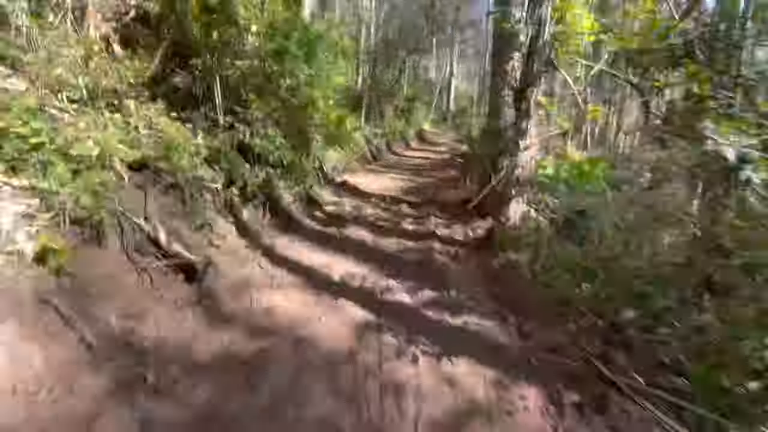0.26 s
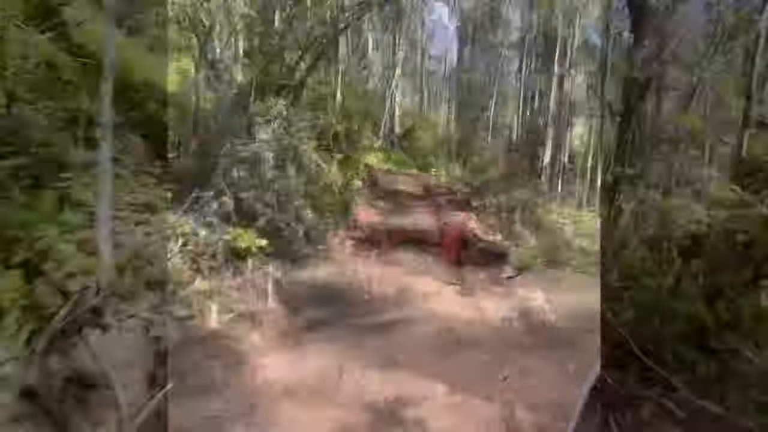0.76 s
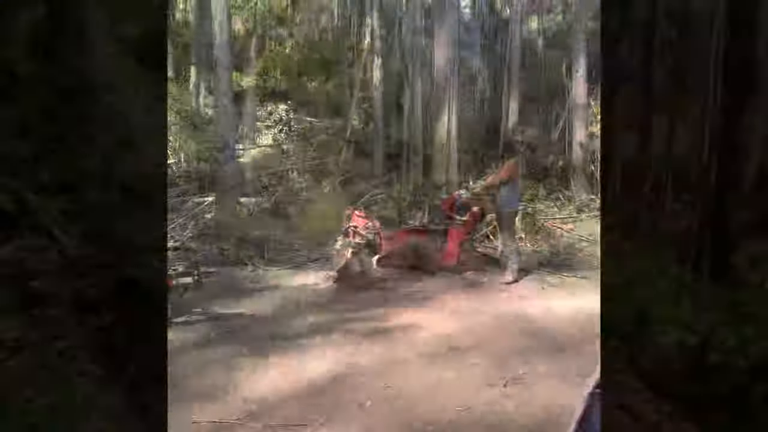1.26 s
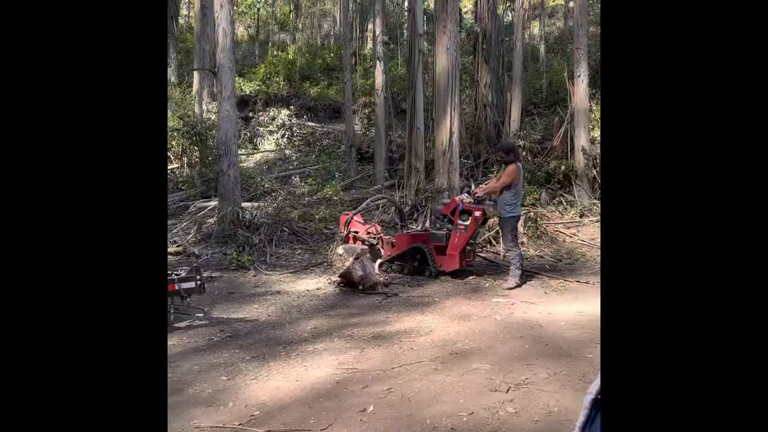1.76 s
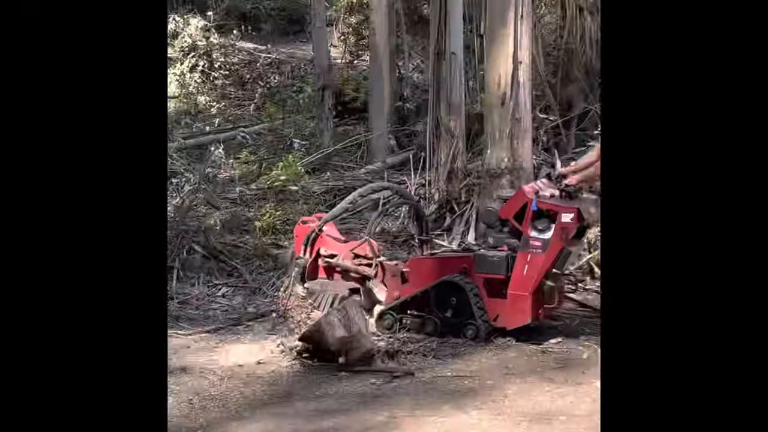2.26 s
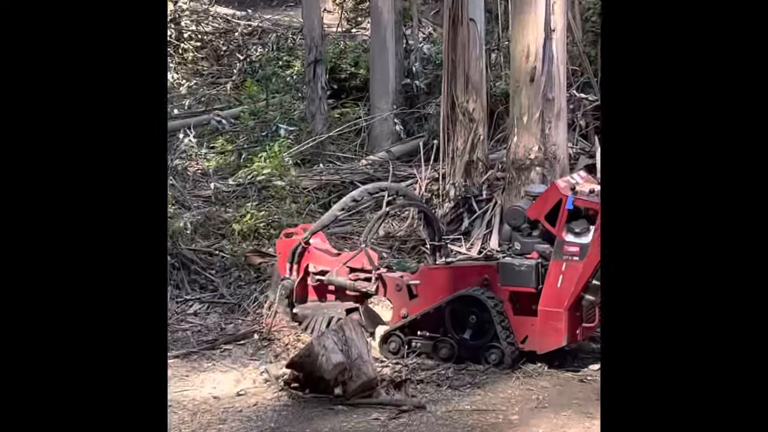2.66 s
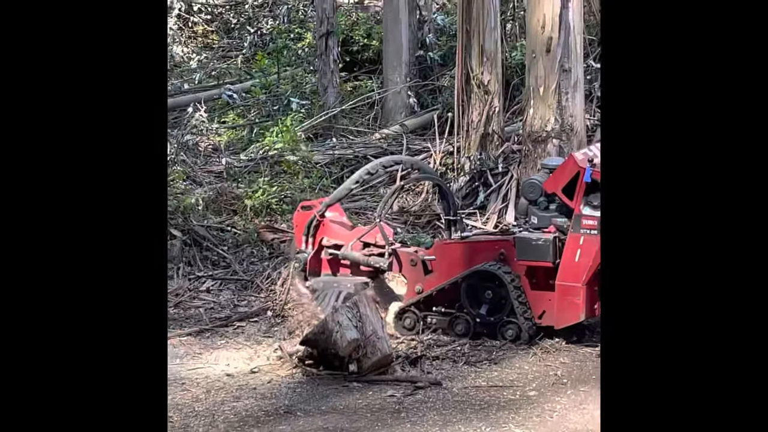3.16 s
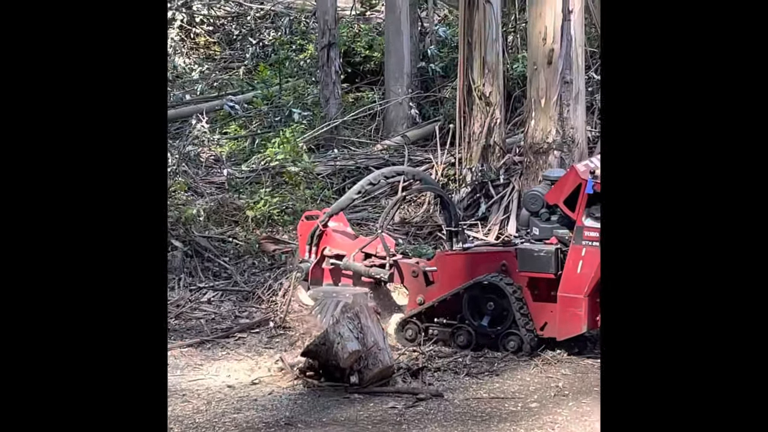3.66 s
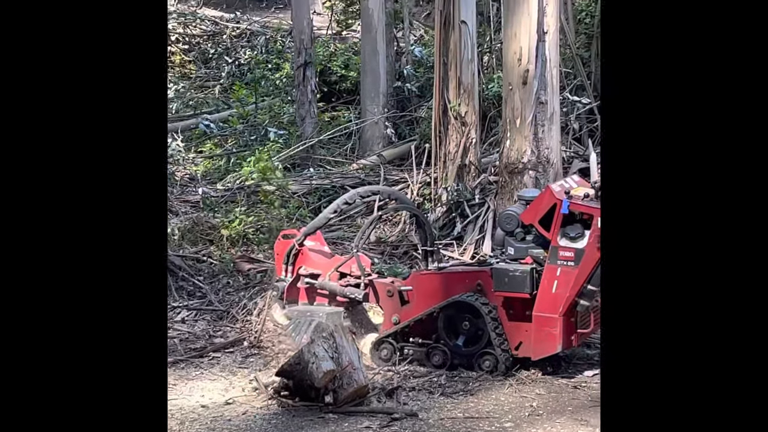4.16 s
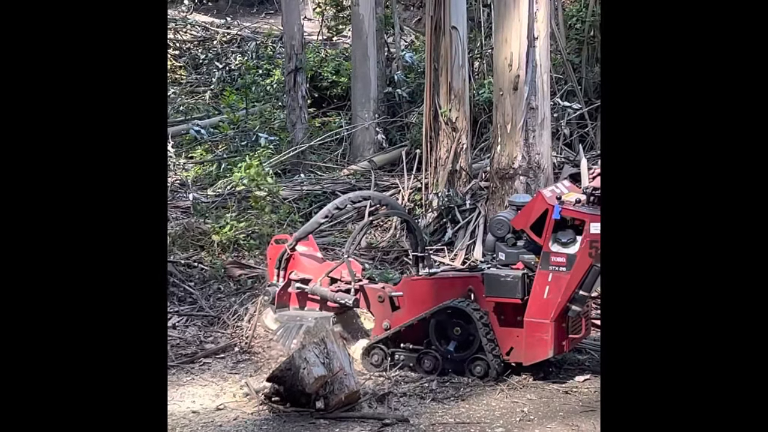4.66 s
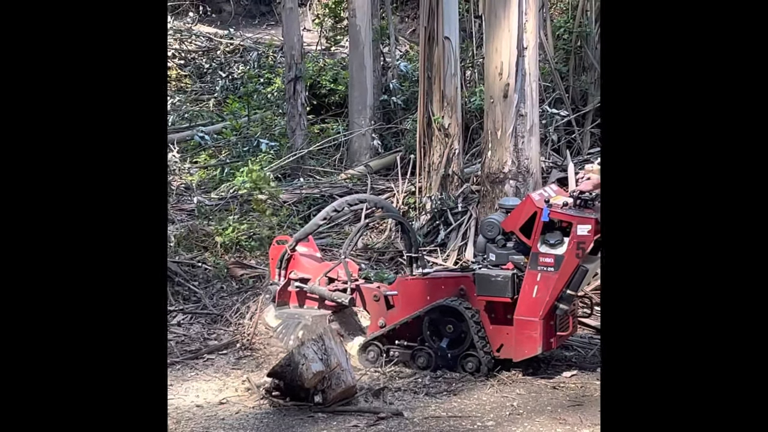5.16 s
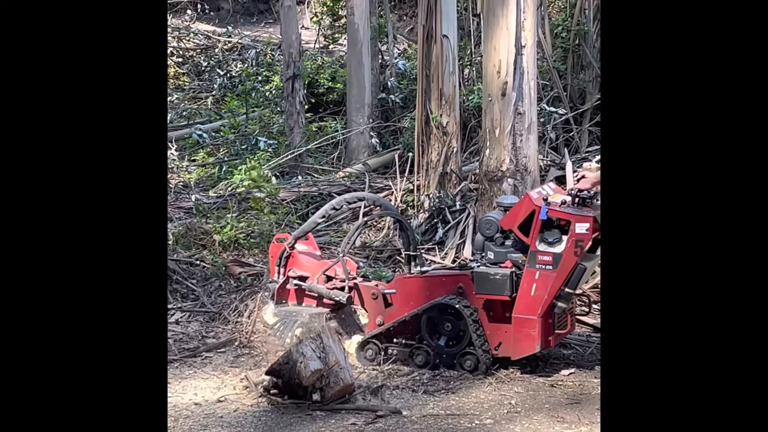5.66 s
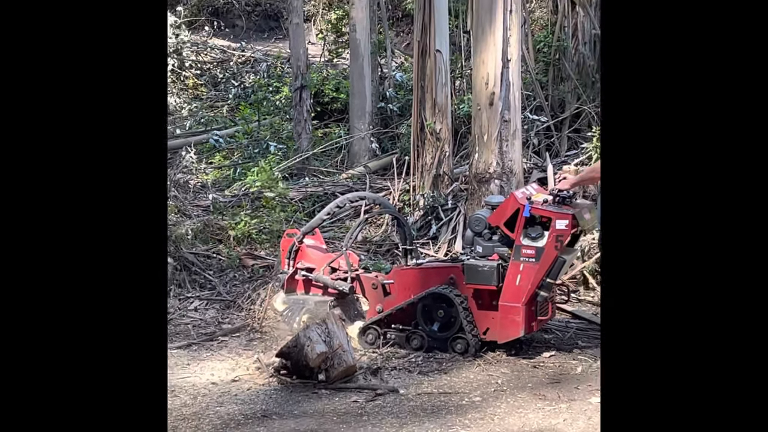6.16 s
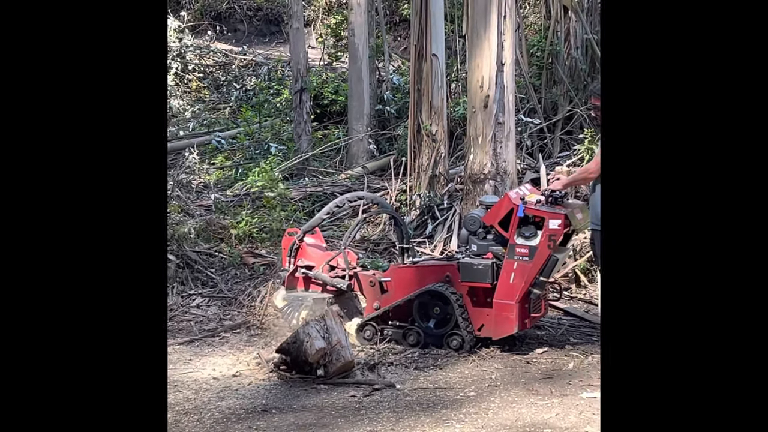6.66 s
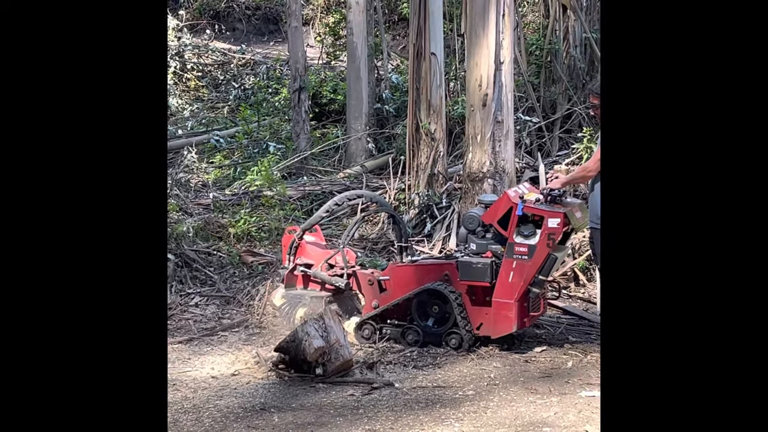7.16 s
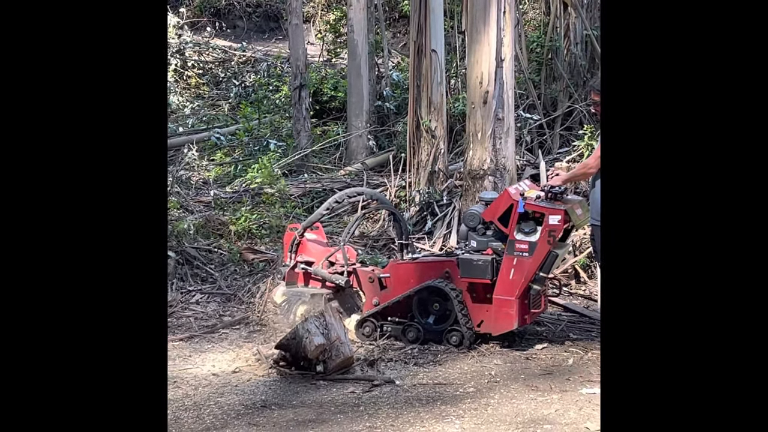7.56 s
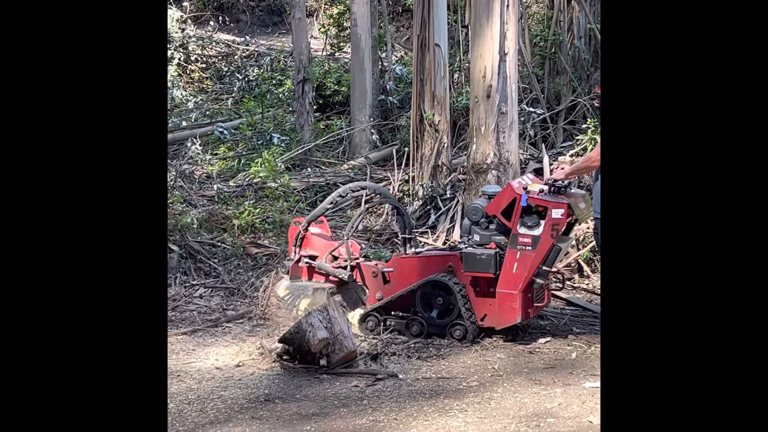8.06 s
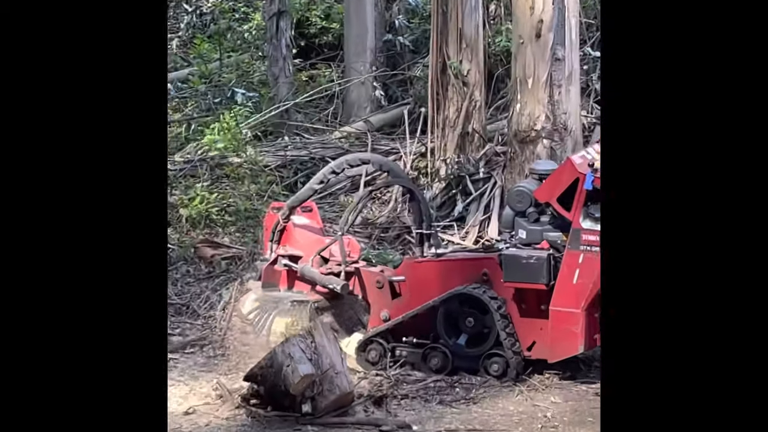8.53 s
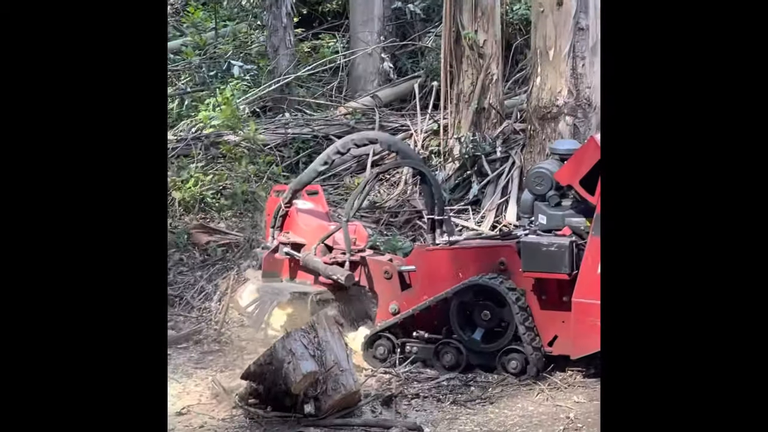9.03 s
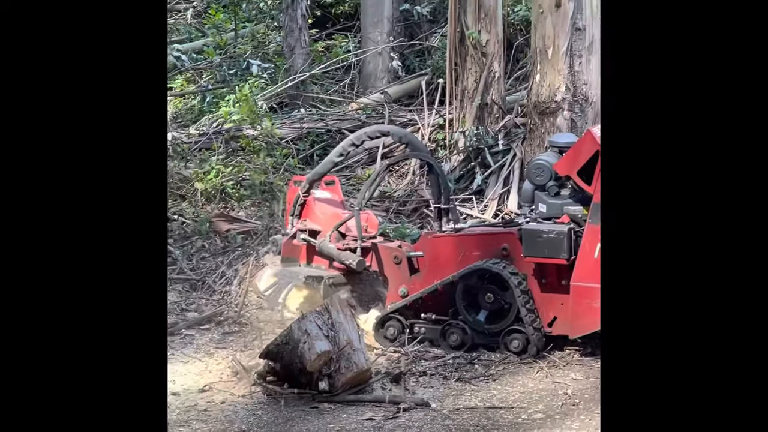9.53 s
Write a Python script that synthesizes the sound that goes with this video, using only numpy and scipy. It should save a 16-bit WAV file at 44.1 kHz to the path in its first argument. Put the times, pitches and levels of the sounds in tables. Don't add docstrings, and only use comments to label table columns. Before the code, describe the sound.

Small petrol engine fades in droning steadily outdoors, then a stump grinder's toothed wheel bites into wood with rapid knocking, bright cracks and spitting chips.

```python
import sys
import numpy as np
from scipy import signal
from scipy.fft import rfft, irfft
from scipy.io import wavfile
from scipy.ndimage import uniform_filter1d

SR = 44100
rng = np.random.default_rng(int(sys.argv[2]) if len(sys.argv) > 2 else 0)


def generate_wav(signal):
    frames = np.transpose(np.atleast_2d(signal))
    scaled = np.clip(frames, -1, 1) * 32767
    pcm = np.round(scaled).astype(np.int16)
    wavfile.write(sys.argv[1], SR, pcm)


def ratio(d):
    e = np.asarray(d, float) / 20
    return 10 ** e


N = 431738
T = np.arange(N) / SR
F = np.fft.rfftfreq(N, 1 / SR)

# (time [s], load [0-1])
LOAD = [
    (0, 0.4),
    (2.8, 0),
    (3.4, 0.8),
    (9.79, 1),
]
# (time [s], fifth order of the four-stroke cycle [Hz])
SPEED = [(0.38, 142.3), (0.66, 140.3), (0.98, 140.8), (1.36, 144.9), (2.84, 144.8), (3.41, 135.2),
         (6.75, 135.3), (6.85, 132.5), (7.09, 132.7), (7.37, 135.3), (8.49, 135.4), (8.59, 133.6),
         (8.77, 133.8), (8.9, 135.4), (9.68, 135.2)]
# (order [multiple of cycle rate], level [dB])
FREE_ORDERS = [(1, -50), (2, -6), (3, -7), (4, -21), (5, 0), (6, -8), (7, -12.5), (8, -17), (9, -21.5),
               (10, -19), (11, -28), (12, -48), (13, -29), (14, -43), (15, -44), (16, -26)]
# (order [multiple of cycle rate], level [dB])
LOADED_ORDERS = [(1, -42), (2, -5), (3, -15), (4, -36), (5, 0), (6, -8.5), (7, -36), (8, -12), (9, -14.5),
                 (10, -32), (11, -26), (12, -30), (13, -20), (14, -28), (15, -30), (16, -30)]
# (pump multiple [-], level [dB])
PUMP_REST = [(2, -22), (3, -31), (4, -29)]
# (start [s], length [s], pump multiple [-], level [dB])
VALVES = [
    (.5, .67, 3, -13),
    (.55, .5, 4, -15),
    (.8, 2.05, 2, -9),
    (1.2, 1.75, 4, -16),
    (3.0, .33, 3, -14),
]
# (frequency [Hz], level per Hz [dB])
ROAR = [(40, -6.5), (200, 2), (330, 0.5), (430, -5.5), (600, 0), (1300, -2.5), (1650, -3.5), (2400, -4.5),
        (3200, -9), (5500, -14.5), (8500, -14.5), (10300, -8), (12000, -21), (14000, -38)]
# (frequency [Hz], width [Hz], level [dB])
PANELS = [(630, 92, 2.5), (830, 103, -1), (1115, 92, 4.5), (1243, 110, 1.5), (1710, 89, -1),
          (1347, 100, 3.5), (1762, 52, 4.5), (2020, 136, 5.5), (2348, 83, 3.5), (4970, 750, 2.5)]
# (frequency [Hz], level [dB])
SCATTER = [(250, -30), (480, -12), (1000, -9), (1700, -14), (2600, -8), (5000, -6), (8000, -7), (10500, -9),
           (14000, -9)]
# (time [s], effort [dB])
EFFORT = [(2.72, -6), (2.9, 0), (3.0, -3.5), (3.15, 3.5), (3.27, 4.5), (3.41, 2.5), (3.5, 1.5), (3.72, -1),
          (3.88, -1), (4.02, -1.5), (4.4, 0), (4.65, 0), (5.3, -0.5), (6.9, -1), (7.9, -4.5), (8.45, -2),
          (9.3, -1.5), (9.79, -3)]
# (frequency [Hz], width [Hz], level [dB])
STUMP = [(104, 23, -13), (241.5, 87, -9), (355.2, 18.8, 2.5), (380, 78, -8)]
# (frequency [Hz], width [Hz], level [dB])
GUARD = [(566, 22.8, 4), (653.6, 49, 0.5), (824, 126, -14.5), (1026, 46, -3.5), (1107, 41, -2.5),
         (1303, 24, -8), (1802, 62, -10.5), (1960, 78, -4.5)]
# (frequency [Hz], level per Hz [dB])
CHIPS = [(1500, 5.5), (3000, -5.5), (5500, -0.5), (8500, -8), (10500, -1.5), (11300, 8.5), (12200, -17),
         (13200, -6), (14500, -39)]
# (time [s], knock [dB], thud above the knock [dB])
BLOWS = [(3.1987, -21, -2), (3.2685, -20, -3), (3.3, -20, -3), (3.34, -22, -9), (3.3689, -10, 2.5),
         (3.4062, -13, 6), (3.8264, -17, 0), (4.306, -15, -6), (4.3446, -13, -1), (4.5525, -22, 3),
         (4.6545, -15, 2), (5.004, -9.5, -3), (5.314, -9, -11), (5.4215, -9, -11), (5.4916, -12.5, -0.5),
         (6.0305, -16, -14), (6.3454, -7, -7), (6.5193, -10, -16), (6.8167, -12, -2), (6.961, -9.5, -4.5),
         (7.065, -11, -5), (7.5177, -14.5, 4.5), (8.0024, -18, -7), (8.3477, -7.5, -18), (8.384, -5, -6.5),
         (8.418, -7, -8), (8.5254, -7.5, 1.5), (8.6698, -7.5, -6), (8.9147, -9.5, -3.5), (9.2316, -17, -6)]
# (time [s], crack [dB], scrape above the crack [dB])
BITES = [(3.2307, -5, -17), (3.2662, -11, -14), (3.319, -10, -18), (3.334, -8, -24), (3.3689, -9, -22),
         (3.4043, -11, -9), (3.4612, -8, -15), (3.509, -9, -13), (3.5989, -9, -13), (3.6468, -12, -8),
         (3.681, -14, -5), (3.786, -14, -12), (3.856, -16, -1), (3.946, -8.5, -12), (4.4984, -11, -17),
         (5.0002, -14, -8), (5.281, -13, -9), (6.185, -15.5, -5), (6.6554, -11, -10), (6.8161, -10, -7),
         (6.9567, -11, -8), (8.3481, -16, -7), (8.4187, -13, -1), (8.526, -18, 3.5), (8.6726, -16.5, 0),
         (8.8769, -22, 3), (8.9817, -11, -10), (9.0854, -13.5, -8), (9.1238, -11, -9), (9.651, -11, -10)]
# (frequency [Hz], level per Hz [dB])
CRACK = [(2000, -5), (4000, -29), (6500, -5), (9000, 1), (10300, 8), (11300, 5.5), (12300, -19),
         (13500, -15), (14500, -34)]
# (frequency [Hz], left minus right [dB])
PORT_DB = [(250, -0.2), (370, 1.6), (480, 7.2), (620, 4.7), (760, 2.3), (950, 9.3), (1080, 7.7),
           (1230, 3.0), (1350, 4.2), (1600, 0.1)]
# (frequency [Hz], phase by which left leads [rad])
PORT_PHASE = [(250, 0), (400, .5), (620, -.2), (800, .3), (1250, -.5), (1600, 0), (2100, .1), (2450, .6),
              (4000, .7),
              (4500, 1.3), (5000, 3.6), (5300, 5.4), (5700, 6.1), (6350, 6.6), (8400, 8.9), (9100, 9.42),
             (9700, 9.8), (11600, 11.7), (12000, 12.57), (22050, 12.57)]
# (lower edge [Hz], its flutter [Hz], upper edge [Hz], its flutter [Hz])
SUM_GAPS = [(8500, 170, 9620, 30), (13300, 380, 23000, 0)]
# (lower edge [Hz], its flutter [Hz], upper edge [Hz], its flutter [Hz])
DIFFERENCE_GAPS = [(-1, 0, 250, 20), (1620, 60, 2050, 260), (5700, 70, 6300, 40), (11750, 40, 23000, 0)]
SHARP_S = [3.25, 3.27, 3.32, 3.45, 3.66, 3.95, 5.83, 6.12, 6.81, 8.53, 9.33, 9.58]

FADE_START_S, FADE_S, FADE_BEND = 0.38, 1.12, 1.38
ENGINE_DB, LOAD_SAG_DB = -16.5, -0.5
SECOND_FIRING = 3 / 8
PUMP_ORDER, VALVE_SLEW_S = 9.85, 0.13
FAN_ORDER, FAN_DB, BELT_ORDERS, BELT_DB = 26, -21, (18.7, 22.85, 60.1), -23
ROAR_DB, ROAR_LOAD_DB, ROAR_PATCHY_DB = -6.5, 1.81, 0.7
TOOTH_HZ = 57.41
PROUD_TURN = 1.55
KNOCK_DB, RING_DB, CHIP_DB = -23, -25.5, -33
KNOCK_SLOPE, RING_SLOPE, CHIP_SLOPE = 1.74, 0.38, 0.96
GRAIN_DB = 0.35
TOUCH_RING_DB, TOUCH_S, TOUCH_LENGTH_S = 4, 3.09, 0.14
BITE_SHARE, BLOW_SHARE = 0.24, 0.19
SMALL_CRACK_DB, SMALL_SCRAPE_DB = -16, -9.5
SMALL_KNOCK_DB, SMALL_THUD_DB, SMALL_SPREAD_DB = -14.5, -17, 2
TOP_HZ = 13900


def level_over_time(table):
    return np.interp(T, *np.transpose(table))


def along(points):
    hz, value = np.transpose(points)
    return np.interp(np.log(F + 1), np.log(hz + 1), value)


def unit(x):
    return x / np.sqrt(np.mean(x ** 2))


def colour(x, gain):
    return irfft(rfft(x) * gain, N)


def modes(table):
    total = 0
    for k, (hz, width, db) in enumerate(table):
        damping = 1j * F * width
        total = total + (-1) ** k * ratio(db) * damping / (hz ** 2 - F ** 2 + damping)
    return total


def walk(rate):
    hold = int(SR / rate)
    steps = np.repeat(rng.standard_normal(N // hold + 1), hold)
    return 0.674 * uniform_filter1d(uniform_filter1d(steps, hold), hold)[:N]


def bursts(times, size, decay_s):
    hits = np.zeros(N)
    np.add.at(hits, np.clip((times * SR).astype(int), 0, N - 1), size ** 2)
    power = signal.lfilter([1], [1, -np.exp(-2 / (decay_s * SR))], hits)
    return np.sqrt(np.abs(uniform_filter1d(power, size=40, origin=19)))


def exhaust(turn, load):
    out = 0
    for (k, free_db), (_, loaded_db) in zip(FREE_ORDERS, LOADED_ORDERS):
        unsteady_db = (0.06 + 0.1 * load) * k * walk(14)
        db = free_db + load * (loaded_db - free_db) + unsteady_db
        lead = 2.4 + 1.2 * np.exp(-((k - 5.5) / 1.3) ** 4) + 0.012 * k * walk(12)
        sign = np.sign(np.cos(np.pi * k * SECOND_FIRING))
        out = out + sign * ratio(db) * np.cos(2 * np.pi * k * turn + lead)
    return 1.3 * out


def pump(turn):
    out = 0
    for k, rest_db in PUMP_REST:
        db = rest_db + 1.5 * walk(9)
        for start, length, line, held_db in VALVES:
            if line == k:
                inside_s = np.minimum(T - start, start + length - T)
                db = db + (held_db - rest_db) * np.clip(inside_s / VALVE_SLEW_S + 0.5, 0, 1)
        out = out + ratio(db) * np.cos(2 * np.pi * k * PUMP_ORDER * turn + 0.1 * walk(15))
    return out


def fan_and_belt(turn, load):
    out = ratio(FAN_DB - 6 * load) * np.cos(2 * np.pi * FAN_ORDER * turn)
    for k in BELT_ORDERS:
        out = out + ratio(BELT_DB - 12 * load + 2 * walk(8)) * np.cos(2 * np.pi * k * turn)
    return out


def roar(turn, load):
    puff = np.exp(-(turn % 1) / 0.16) + 0.55 * np.exp(-((turn - SECOND_FIRING) % 1) / 0.16)
    clatter = unit(np.interp(turn % 1, np.linspace(0, 1, 250), rng.standard_normal(250)))
    clatter = colour(clatter, F ** 4 / (F ** 4 + 900 ** 4))
    noise = rng.standard_normal(N) + (0.3 - 0.16 * load) * clatter
    noise = noise * (1 + 1.1 * puff) * ratio(1.2 * walk(25))
    panels_db = sum(db * np.exp(-0.5 * ((F - hz) / (width / 2)) ** 2) for hz, width, db in PANELS)
    return unit(colour(noise, ratio(along(ROAR) + panels_db)))


def trunks(x):
    z = signal.stft(x, nperseg=512)[2]
    paths = np.exp(2j * np.pi * rng.random((2,) + z.shape))
    scattered = signal.istft(z * paths, nperseg=512)[1][:, :N]
    return colour(scattered, ratio(along(SCATTER) - 1.2))


def wheel():
    effort_db = level_over_time(EFFORT)
    knock_db = KNOCK_DB + KNOCK_SLOPE * effort_db + GRAIN_DB * walk(11)
    ring_db = RING_DB + RING_SLOPE * effort_db + GRAIN_DB * walk(11)
    chip_db = CHIP_DB + CHIP_SLOPE * effort_db + GRAIN_DB * walk(11)

    count = int(N / SR * 60)
    slip, force, ring_luck, chip_luck = rng.standard_normal((count, 4)).T
    times = (np.arange(count) + PROUD_TURN + 0.1 + 0.03 * slip) / TOOTH_HZ
    teeth_db = np.resize([-3.5, -9, -3.0, -10.0], count)
    knock = bursts(times, ratio(teeth_db + 4 * force), 0.003)
    ring = bursts(times, ratio(teeth_db + 2.9 * force + 1.4 * ring_luck), 0.0022)
    chip = bursts(times, ratio(teeth_db + 4.6 * chip_luck), 0.0052)
    fibre_noise, guard_noise, chip_noise = rng.standard_normal((3, N))

    push = np.diff(bursts(times, ratio(teeth_db + 2.7 * force), 0.00082), prepend=0)
    pushed = unit(colour(push, modes(STUMP)))
    torn = unit(colour((0.76 + knock) * fibre_noise, modes(STUMP)))
    stump = unit(pushed + 1.02 * torn) * ratio(knock_db)

    touch_db = TOUCH_RING_DB * np.exp(-((T - TOUCH_S) / TOUCH_LENGTH_S) ** 2)
    guard = unit(colour((0.37 + ring) * guard_noise, modes(GUARD))) * ratio(ring_db + touch_db)
    chips = unit(colour((0.18 + chip) * chip_noise, ratio(along(CHIPS)))) * ratio(chip_db)
    return (stump + guard + chips) * np.clip((T - EFFORT[0][0]) / 0.11, 0, 1)


def small_spots(share, first_db, second_db):
    luck, slip, size, body = rng.random((int(N / SR * TOOTH_HZ / 2), 4)).T
    s = (2 * np.arange(len(luck)) + PROUD_TURN + 0.2 * slip) / TOOTH_HZ
    effort_db = np.interp(s, *np.transpose(EFFORT))
    first = first_db + SMALL_SPREAD_DB * 2 * (2 * size - 1) + effort_db / 2
    second = second_db + SMALL_SPREAD_DB * 2 * (2 * body - 1)
    return np.transpose([s, first, second])[(luck < share) & (s > EFFORT[0][0])]


def hard_spots():
    crack_noise, scrape_noise, knock_noise, thud_noise = rng.standard_normal((4, N))
    small_bites = small_spots(BITE_SHARE, SMALL_CRACK_DB, SMALL_SCRAPE_DB)
    s, crack_db, scrape_db = np.vstack([BITES, small_bites]).T
    crack = unit(colour(crack_noise, ratio(along(CRACK)))) * bursts(s, ratio(crack_db - 5.5), 0.0031)
    scrape = unit(colour(scrape_noise, modes([(3350, 2000, 0)])))
    scrape = scrape * bursts(s, ratio(crack_db + scrape_db - 3.5), 0.0089)

    small_blows = small_spots(BLOW_SHARE, SMALL_KNOCK_DB, SMALL_THUD_DB)
    s, knock_db, thud_db = np.vstack([BLOWS, small_blows]).T
    tooth_modes = modes([(1100, 220, -7.0), (1960, 200, 1), (2440, 310, -5.0), (3080, 1500, -16.0)])
    knock = unit(colour(knock_noise, tooth_modes)) * bursts(s, ratio(knock_db - 7.0), 0.0078)
    thud = thud_noise * bursts(s + 0.003, ratio(knock_db + thud_db), 0.011)
    thud = unit(colour(thud, modes(STUMP) + ratio(3) * modes(GUARD)))
    return crack + scrape + knock + ratio(-31.5) * thud


def scene():
    load = np.clip(level_over_time(LOAD), 0, 1)
    cycle_hz = level_over_time(SPEED) / 5 * (1 + 0.002 * load * walk(4))
    turn = np.cumsum(cycle_hz) / SR + 0.0015 * walk(10)
    fade = 1 - np.clip(1 - (T - FADE_START_S) / FADE_S, 0, 1) ** FADE_BEND
    running = ratio(ENGINE_DB + LOAD_SAG_DB * load) * fade
    tones = (exhaust(turn, load) + pump(turn) + fan_and_belt(turn, load)) * running
    roar_db = ROAR_DB + load * (ROAR_LOAD_DB + ROAR_PATCHY_DB * walk(12))
    noises = ratio(roar_db) * roar(turn, load) * running + wheel() + hard_spots()
    return tones + noises + trunks(noises + 0.4 * tones)


def drop_bands(x, table):
    hz, s, z = signal.stft(x, SR, "cosine", nperseg=2048)
    sharp = np.min(np.abs(s[:, None] - SHARP_S), axis=1) < 512 / SR
    for low, low_flutter, high, high_flutter in table:
        jump = rng.standard_normal((2, len(s)))
        above = hz[:, None] > low + low_flutter * jump[0]
        below = hz[:, None] < high + high_flutter * jump[1]
        z = np.where(above & below & ~sharp, 0, z)
    return signal.istft(z, SR, "cosine", nperseg=2048)[1][:N]


def roll_off(x):
    return signal.sosfilt(signal.butter(12, 14860, fs=SR, output="sos"), x)


def record(dry):
    lead = np.interp(F, *np.transpose(PORT_PHASE)) / 2
    port = ratio(along(PORT_DB) / 2) * np.exp(1j * lead)
    rounded = np.tanh(colour(dry, np.array([port, 1 / port])))
    left, right = colour(rounded, 1 / np.sqrt(1 + (F / TOP_HZ) ** 60))
    both = drop_bands(left + right, SUM_GAPS) / 2
    apart = drop_bands(left - right, DIFFERENCE_GAPS) / 2
    started = T > FADE_START_S
    return roll_off(np.array([both + apart, both - apart]) * started)


dry = scene()
out = record(dry)
generate_wav(out)
```